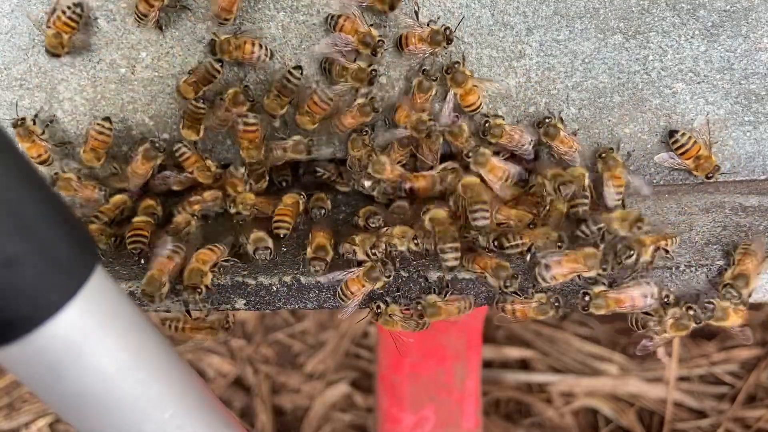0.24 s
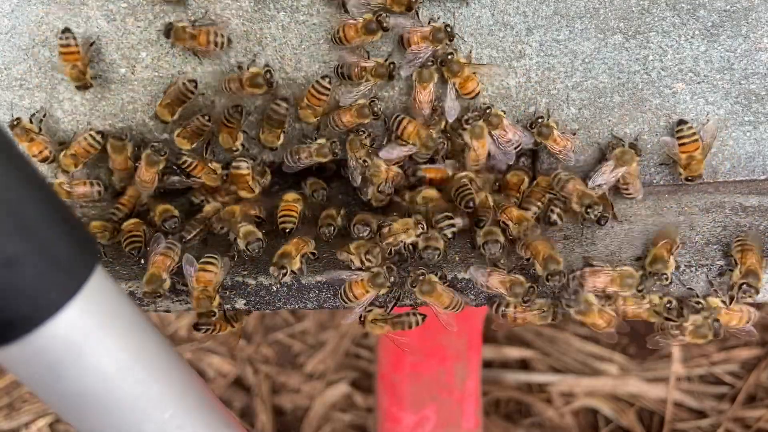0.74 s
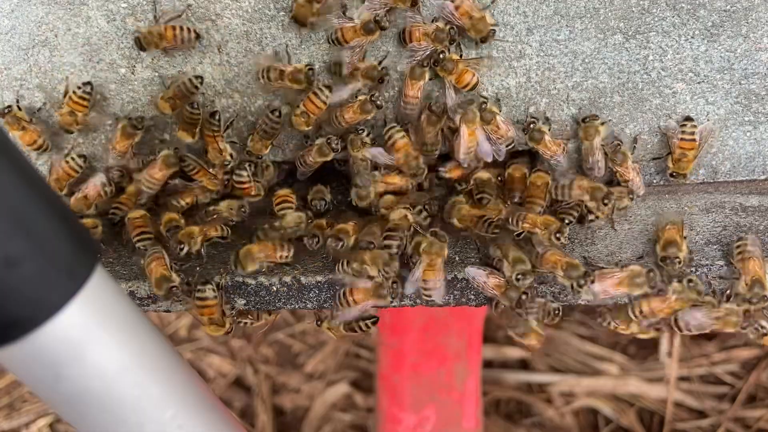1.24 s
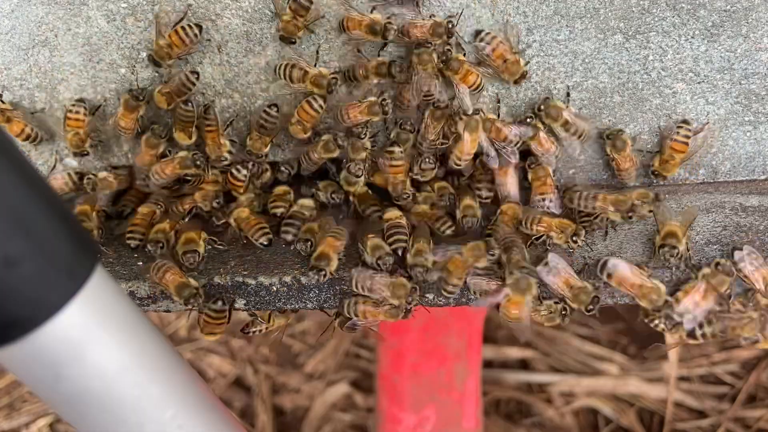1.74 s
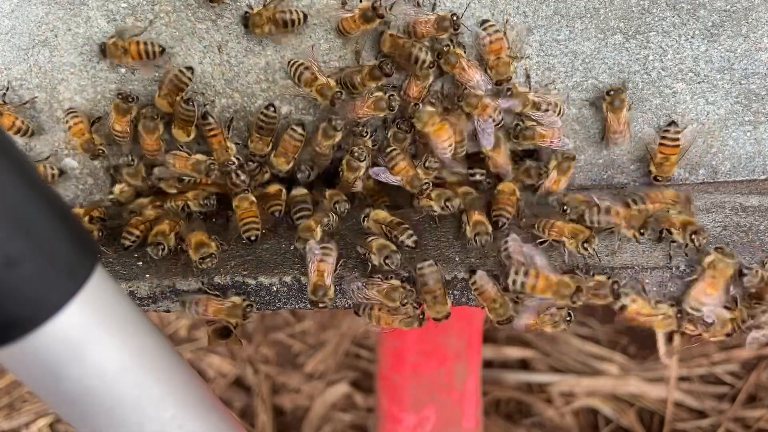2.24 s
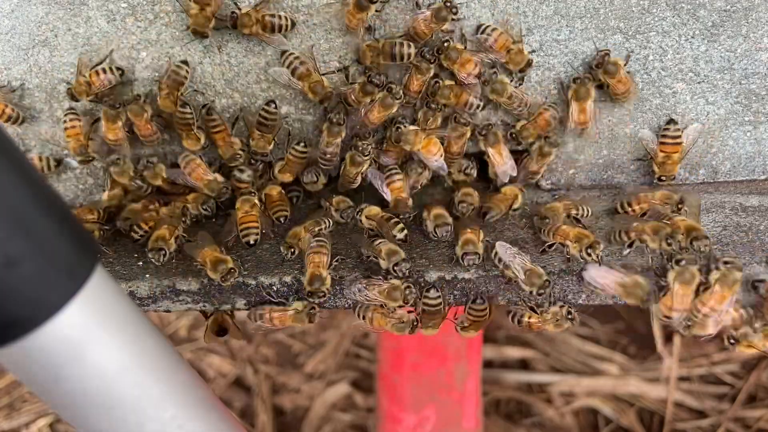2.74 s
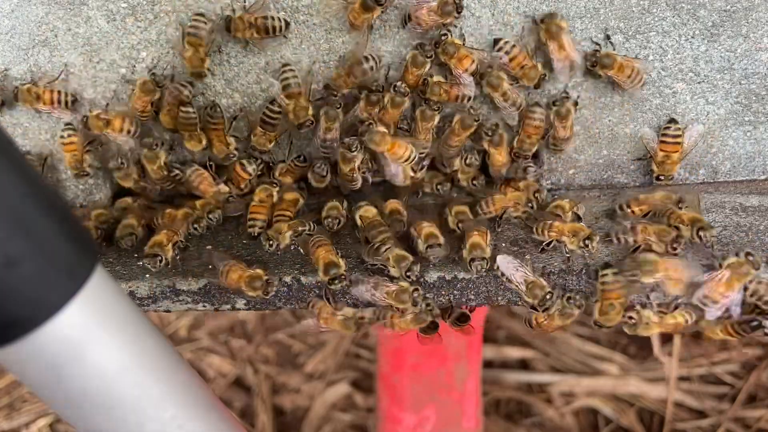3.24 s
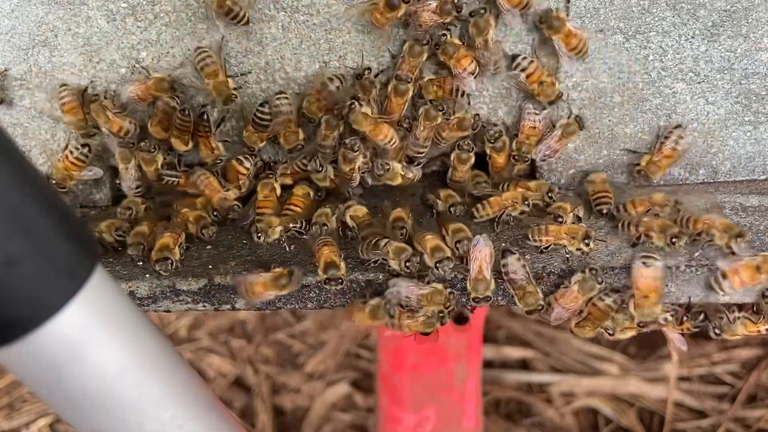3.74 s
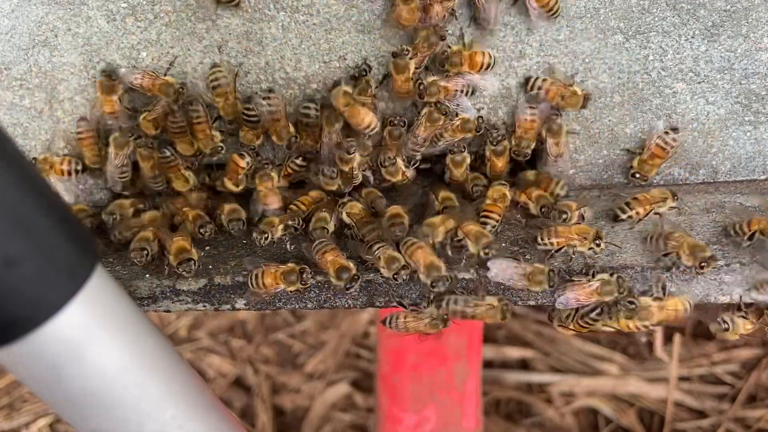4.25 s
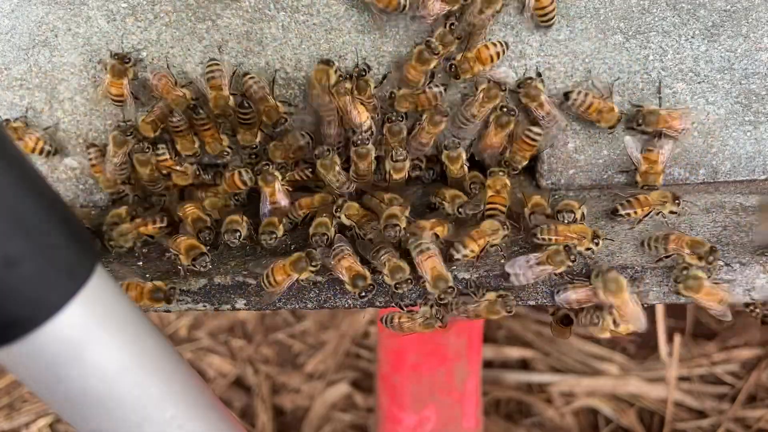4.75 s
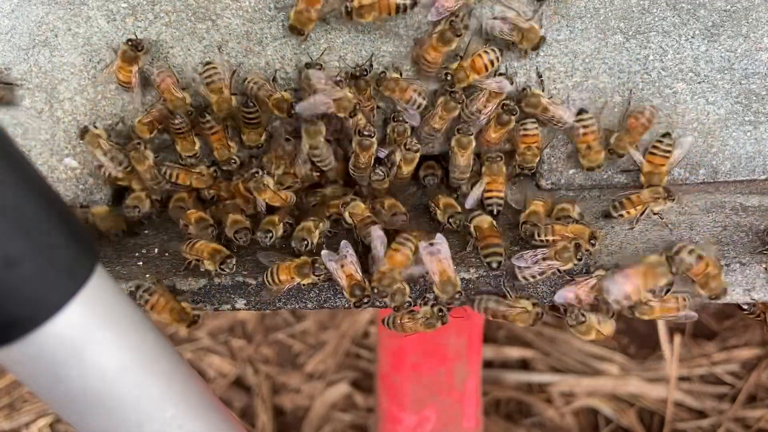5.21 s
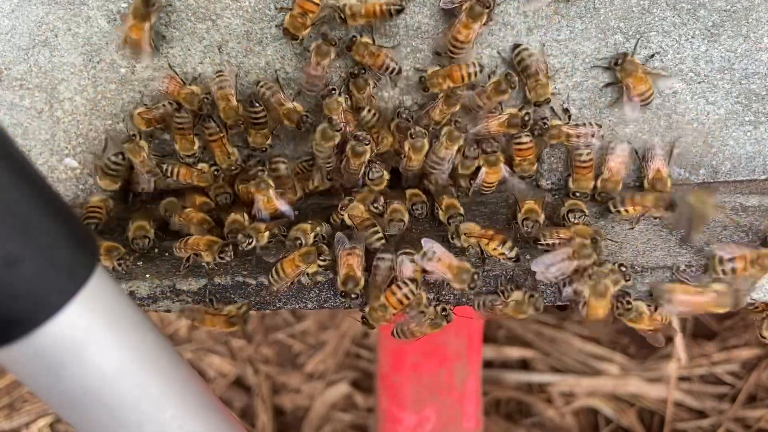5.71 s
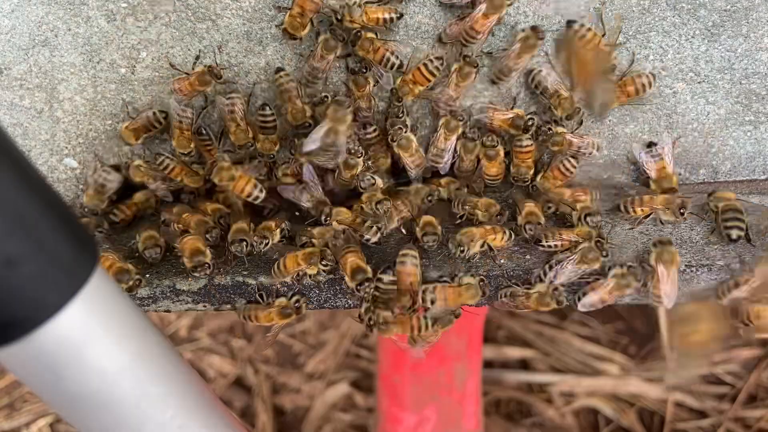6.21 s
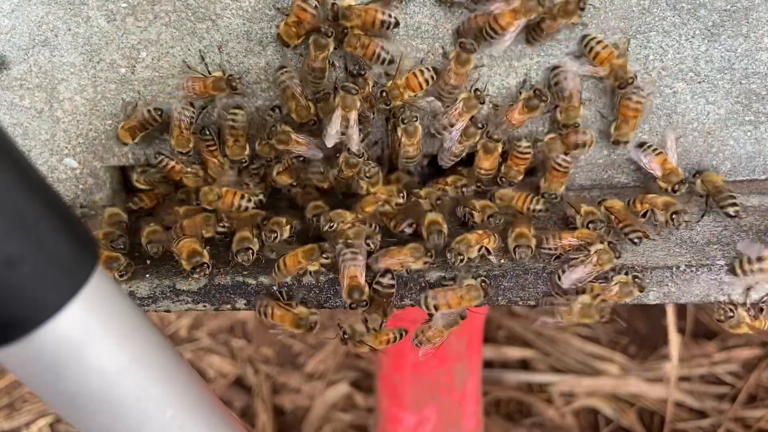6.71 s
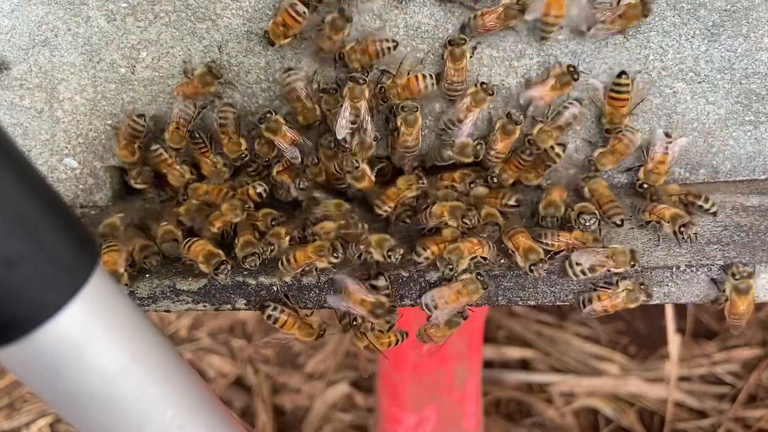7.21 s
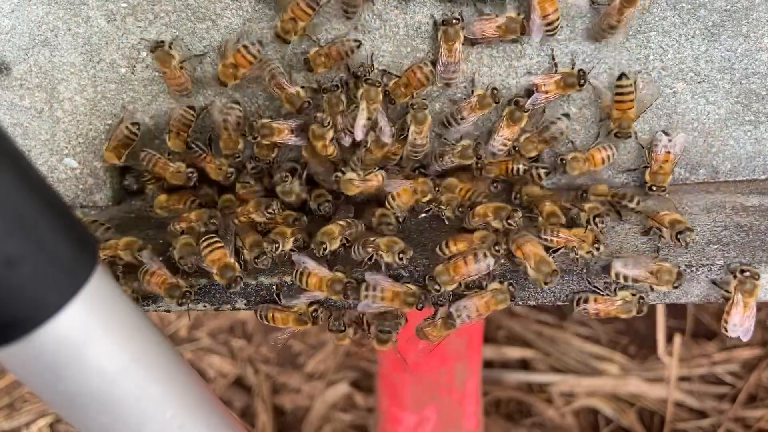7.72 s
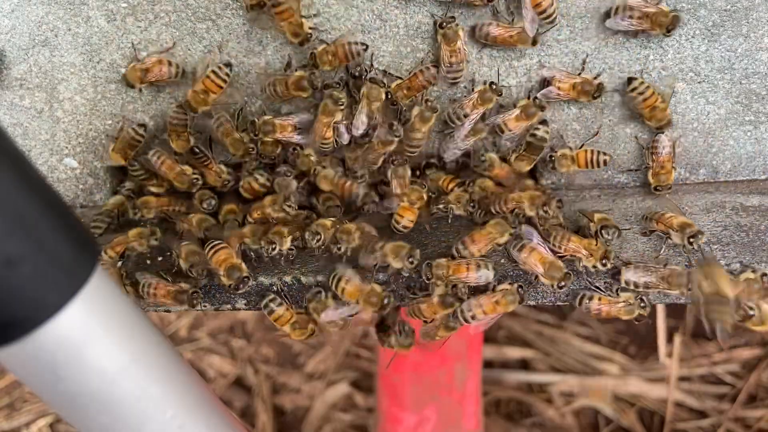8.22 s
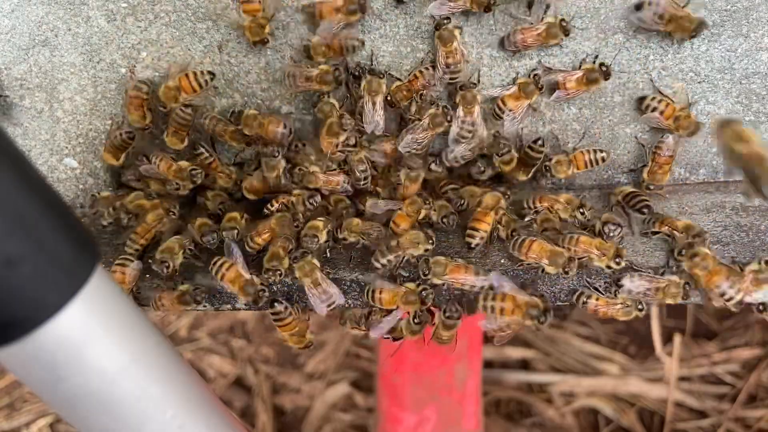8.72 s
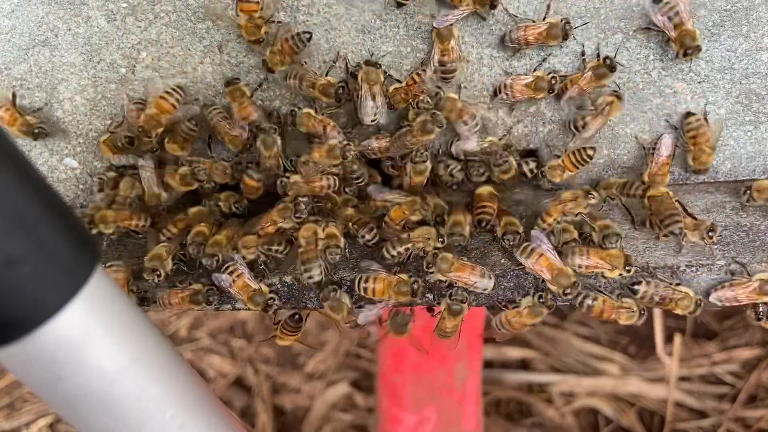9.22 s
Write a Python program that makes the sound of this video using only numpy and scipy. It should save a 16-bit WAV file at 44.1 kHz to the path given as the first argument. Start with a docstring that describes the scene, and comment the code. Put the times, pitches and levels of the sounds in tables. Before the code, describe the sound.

Dozens of honeybees hum steadily and close at a hive entrance, with nearby buzzes swelling, soft airy hiss and a few dull wind-like thumps.

```python
"""Honeybees at a hive entrance

Dozens of honeybees crowd a hive entrance, heard in stereo, close by in the open air through a phone.
Many wing strokes, each looped at its own drifting beat, blur into a hum, with hovering bees nearer by.
Brief swells of wing buzz ride on gliding beats, the strongest like bees passing close.
Downwash thumps are gusts of short decaying sine eddies.
Coloured noise gives the steady wing hiss and the low, puffing draught."""
import sys
import numpy as np
from scipy import signal
from scipy.fft import rfft, irfft, next_fast_len
from scipy.io import wavfile

SR = 44100
rng = np.random.default_rng(int(sys.argv[2]) if len(sys.argv) > 2 else 0)


def file_out(sig):
    """Save sig as 16-bit WAV at sys.argv[1]."""
    # one column per channel
    cols = np.atleast_2d(sig).T
    # limit, then scale
    lim = np.clip(cols, -1, 1)
    pcm = np.round(lim * 32767).astype(np.int16)
    wavfile.write(sys.argv[1], SR, pcm)


N = 417186

# wing sound by overtone, the first lifted close up by sloshing air:
# (multiple of the beat, far level [dB], near level [dB])
WING_OVERTONES = [(1, -12.5, -1), (2, -1, -8), (3, -13, -21.5), (4, -15, -22.5), (5, -11.5, -24.5),
                  (6, -11, -28), (7, -15, -41), (8, -23.5, -47), (9, -27, -40), (10, -29.5, -42),
                  (11, -26.5, -36), (12, -35, -49), (13, -42, -51), (14, -47, -52)]
_, FAR_DB, NEAR_DB = np.transpose(WING_OVERTONES)
# colour of the wing hiss: (frequency [Hz], relative level per Hz [dB])
HISS_COLOUR = [(300, -6.5), (600, -4.5), (1100, -7.5), (1650, -5.5), (2200, -9.5), (2900, -10), (3600, -14),
               (6800, -16), (8200, -16), (9800, -19.5), (11800, -18.5), (13500, -21.5), (14600, -18.5),
               (15700, -21.5)]
# hum of the whole crowd: (time [s], level [dB], middle wing beat [Hz])
CROWD_HUM = [(0, -40, 248), (0.66, -39, 249.5), (1.1, -40, 246.9), (1.9, -38, 247.8), (3.3, -37.5, 241.4),
             (4.5, -38.5, 246.4), (4.75, -35, 249.5), (5.1, -39, 243.7), (5.5, -35.5, 250.2),
             (5.75, -37.5, 243.7), (6.3, -36.5, 246.9), (6.8, -38, 241.8), (7.9, -37.5, 253.9),
             (9.0, -38, 248.9), (9.46, -37, 253.8)]
# waves of bees hovering near the phone:
# (time [s], buzz level [dB], draught level [dB], middle wing beat [Hz])
HOVER_WAVES = [(0, -38, -53, 240), (0.45, -38.5, -51, 227.6), (0.7, -37, -63, 247),
               (1.05, -56.5, -57.5, 240), (1.36, -55, -56, 242.3), (1.71, -37.5, -51.5, 253.7),
               (2.2, -41.5, -48.5, 246.2), (3.4, -41.5, -50.5, 233.7), (4.06, -42, -48.5, 241.8),
               (4.3, -38, -46.5, 238.2), (4.6, -42.5, -49.5, 245.8), (5.3, -34.5, -52, 238.3),
               (5.56, -47.5, -54, 246.8), (6.2, -44, -58, 244.2), (6.48, -45, -53, 251.7),
               (6.72, -37.5, -47.5, 230.2), (7.22, -39, -55, 248.3), (7.55, -60, -60, 254.2),
               (7.82, -51.5, -55, 250.4), (8.14, -38.5, -50, 255.1), (8.6, -40, -51.5, 242.9),
               (9.01, -39, -47.5, 252.3), (9.27, -37, -48, 259.5), (9.46, -37, -48, 239.7)]


def undb(db):
    """Decibels to gain."""
    return 10 ** (np.asarray(db) / 20)


def level(x, db):
    """Scale to an rms level."""
    return x * undb(db) / np.sqrt(np.mean(x ** 2))


def pan(left_minus_right_db):
    """Left and right gains that split a level difference evenly."""
    return undb(np.array([[left_minus_right_db], [-left_minus_right_db]]) / 2)


def curves(table):
    """Columns of a time table, one value per sample."""
    s, *columns = np.transpose(table)
    return [np.interp(np.arange(N) / SR, s, column) for column in columns]


def walk(rate):
    """Smooth random drift with about rate turns a second; spread near 1."""
    noise = rng.standard_normal(int(N / SR * rate * 4) + 12)
    steps = np.convolve(noise, np.hanning(9), "same")
    return np.interp(np.arange(N) * (rate * 4 / SR), np.arange(len(steps)), steps) / np.sqrt(3)


def wings(hz, order_db, lag_s):
    """One bee: a stroke shape built of overtones, looped at the beat rate, reaching the right side lag_s later."""
    turn = np.arange(257) / 256
    order = np.arange(1, len(order_db) + 1)[:, None]
    overtones = np.sin(2 * np.pi * (order * turn + rng.random(order.shape)))
    stroke = np.sum(undb(order_db)[:, None] * overtones, axis=0)
    phase = np.cumsum(hz) / SR
    return np.array([np.interp((phase - late) % 1, turn, stroke) for late in (0, lag_s * hz)])


def crowd(beat_hz, beat_spread, order_db, swell_db, side_db, spread_s, wander, count):
    """Many bees, each with its own beat, place and coming and going, blurring into one buzz."""
    flutter = .012  # quick unsteadiness, share of the beat
    edge_dull_db = -5  # bees far from the middle beat lose overtones, per octave
    out, octave = 0, np.log2(np.arange(len(order_db)) + 0.5)
    for k in range(count):
        lag_chance, side_chance = rng.standard_normal(2)
        own = np.arcsin(.9 * (2 * (k + .5) / count - 1))  # most beats near the middle of the range
        hz = beat_hz * (1 + beat_spread * own + wander * np.tanh(walk(5.0)) + flutter * walk(30))
        dull_db = edge_dull_db * own ** 2 * np.maximum(octave - 1, 0)
        colour_db = dull_db + 2.0 * rng.standard_normal(len(order_db))
        bee = wings(hz, order_db + colour_db, -.00015 + spread_s * lag_chance)
        coming_and_going = undb(swell_db * np.tanh(walk(11.0) / 1.63))
        out = out + bee * coming_and_going * pan(side_db + 3.6 * side_chance)
    return level(out, 0)


def airy(spectrum):
    """Coloured stereo noise: a shared part with a phase offset, the rest unrelated; rms 1."""
    # stereo image of the noise by frequency:
    # (frequency [Hz], likeness [0-1], phase offset, left ahead [rad], left minus right [dB])
    stereo_image = [(60, 0.84, -1, 4.5), (305, 0.48, 0, -9.5), (980, 0.73, -1.3, 6.5), (2210, 0.59, 0, -2),
                    (5270, 0.6, -1, -4), (7140, 0.52, 0.5, 2), (8350, 1, np.pi, -5), (9690, 1, np.pi, 1),
                    (11010, 0.86, 5.5, -0.5), (13660, 1, 6.5, 0.5), (14240, 0.99, 3 * np.pi, 0)]
    size = next_fast_len(N)
    log_hz = np.log(np.arange(size // 2 + 1) * SR / size + 1)
    hz, db = np.transpose(spectrum)
    image_hz, *columns = np.transpose(stereo_image)
    like, offset, pan_db = (np.interp(log_hz, np.log(image_hz), column) for column in columns)
    like = np.clip(like, 0, 1)
    left, other = rfft(rng.standard_normal((2, size)))
    right = like * left * np.exp(-1j * offset) + np.sqrt(1 - like ** 2) * other
    pair = np.array([left * undb(pan_db / 2), right * undb(-pan_db / 2)])
    colour = undb(np.interp(log_hz, np.log(hz), db))
    return level(irfft(pair * colour, size)[:, :N], 0)


def crowd_hum():
    """Dozens of far wing beats, close in rate, beat against each other as a hum."""
    hum_db, beat_hz = curves(CROWD_HUM)
    bees = crowd(beat_hz, .105, FAR_DB, swell_db=10.7, side_db=-3.0, spread_s=0.000599, wander=.027, count=34)
    return bees * undb(hum_db)


def hovering_bees():
    """A few bees near the phone, rich in the lowest overtone, come and go in waves."""
    buzz_db, _, beat_hz = curves(HOVER_WAVES)
    bees = crowd(beat_hz, .115, NEAR_DB, swell_db=10.8, side_db=-0.39, spread_s=0.00094, wander=.022, count=12)
    return bees * undb(buzz_db)


def buzz_swells():
    """Brief bell-curve swells of wing buzz on unsteady gliding beats, the strongest like bees passing close."""
    # (peak time [s], wing beat [Hz], buzz level before the swell [dB], bell-curve width [s],
    #  left minus right [dB], brightness [0 near - 1 far wing sound, below 0 beyond near], glide [Hz per s])
    swells = [(0.238, 241, -30.5, 0.015, -2.5, 0.2, -40), (0.45, 210, -43, 0.051, -4, .1, -45),
              (0.64, 251.8, -40.5, 0.06, 2.5, 0.47, -29.5), (1.56, 269.4, -38.5, 0.04, -5.5, 0.24, 31),
              (1.796, 278.5, -34, 0.025, -5.5, .15, -40), (2.3, 249.2, -40, 0.05, -3, 0.76, -39),
              (2.46, 237, -40, 0.06, -4, 0.9, -31.5), (3.45, 226.5, -40, 0.05, -6, 0.045, -44),
              (3.806, 215.7, -39, 0.056, -6.5, .1, -44), (3.816, 253.6, -35.5, 0.027, -6.5, -0.34, -38),
              (4.136, 248.7, -33, 0.033, -5, 0.18, -36), (4.255, 221.4, -38, 0.03, -5, 0.29, -58),
              (4.355, 253.5, -36, 0.026, -2, -0.56, -40), (4.754, 248, -30.5, 0.024, -7, -0.076, -37),
              (4.865, 264.1, -36, 0.075, 4.5, 0.25, -30.5), (4.934, 240.8, -34, 0.038, -3, -0.3, -42),
              (5.178, 241.7, -25.5, 0.055, -3, -0.096, -74), (5.478, 246.3, -27.5, 0.025, -4.5, 0.12, -58),
              (5.58, 261.7, -40.5, 0.05, -1.5, 0.84, -50), (6.13, 251.5, -43, 0.05, -2, 0.58, -34),
              (6.47, 248.3, -40.5, 0.05, -4.5, .6, 30.5), (6.6, 239.9, -35.5, 0.075, -6, 0.023, -110),
              (6.715, 217.8, -37, 0.037, -8, -0.37, -83), (6.795, 241.2, -40, 0.046, 8, -0.58, -59),
              (6.875, 214.1, -34.5, 0.03, 1, 0.28, -300), (6.925, 239.4, -44, 0.018, -1, 0.8, 300),
              (7.089, 250, -37, 0.026, 1, -0.21, -40), (7.239, 243.3, -39, 0.026, 0, -0.28, -40),
              (7.45, 256.2, -44.5, 0.04, -0.5, 0.89, 30), (8.12, 248, -39.5, 0.031, -7, 0.11, -40),
              (9.089, 266.7, -35, 0.041, -6, 0.14, -34), (9.179, 260, -39, 0.08, 7, -0.27, 29),
              (9.29, 273.3, -34, 0.055, -3, 0.74, 69), (9.374, 252.8, -36, 0.035, 1.5, 0.38, -38)]
    swell_hiss_db = -10.5  # hiss of a bright swell against its buzz, scaled by brightness
    out, unsteady, hiss = np.zeros((2, N)), walk(25), airy(HISS_COLOUR)
    for s, hz, db, width, pan_db, bright, glide in swells:
        first, last = max(int((s - 3 * width) * SR), 0), min(int((s + 3 * width) * SR), N)
        span = np.arange(first, last)
        t = span / SR - s
        beat_hz = hz * (1 + 0.01603 * unsteady[span]) + glide * t
        order_db = NEAR_DB + bright * (FAR_DB - NEAR_DB)
        buzz = level(wings(beat_hz, order_db, -.0001 * pan_db), db)
        swell_hiss = max(bright, 0) * undb(db + swell_hiss_db) * hiss[:, span]
        bell = np.exp(-(t / width) ** 2 / 2)
        out[:, span] += (buzz + swell_hiss) * bell * pan(pan_db)
    return out


def thumps():
    """Downwash gusts of shed eddies: small quick ones tend to arrive first, big slow ones last and stay longest."""
    # (start [s], level before the eddy balance [dB])
    gusts = [(0.243, -16), (2.69, -45), (4.707, -38), (4.797, -31.5), (4.817, -30), (5.174, -40),
             (5.483, -43), (6.502, -50), (7.029, -36.5), (8.25, -43), (9.389, -39)]
    # eddy sizes: (nominal rate [Hz], arrival [thump lengths], level [dB])
    eddies = [(55, 0.85, -18), (75.2, 0.59, -8.5), (111.4, 0.54, -6.5), (156, 0.51, -2), (201, 0.28, 2),
              (315, 0.45, 1.5), (460, 0.32, 2), (647, 0.37, -3), (834, 0.33, 0), (963, 0.29, -8)]
    thump_s = 0.043  # unit of eddy time; a gust lasts three
    fine_fall_db, hard_db, fine_gain = -11, -31.5, 0.4  # finer eddies fall per octave, less per dB above hard_db
    out = np.zeros((2, N + SR))
    count = 1 + np.arange(len(eddies)) // 2  # finer eddies come in greater numbers
    hz, arrival, eddy_db = np.repeat(np.transpose(eddies), count, axis=1)[:, :, None]
    share = np.repeat(count, count)[:, None] ** -.5
    t = np.arange(int(3 * thump_s * SR)) / SR / thump_s
    ragged = undb(1.8 * walk(60))  # the gust breaks up as it goes
    for s, db in gusts:
        fall_db = fine_fall_db + fine_gain * max(db - hard_db, 0)
        phase, detune, gap = rng.random((3,) + hz.shape)
        strength = share * undb(db + eddy_db + fall_db * np.log2(hz / 120))
        push = strength * (t / arrival * np.exp(1 - t / arrival)) ** 5.2  # peaks on arrival
        # each eddy slows as it spreads
        turns = hz * (0.8 + 0.414 * detune) * thump_s * t * (1 - 0.053 * t) + phase
        start = int(s * SR)
        push = push * np.resize(ragged[start:], len(t))
        for side in range(2):
            swirl = np.sin(2 * np.pi * (turns + side * 0.4 * (gap - .5)))
            out[side, start:start + len(t)] += np.sum(push * swirl, axis=0)
    return out[:, :N]


def wing_hiss():
    """Airy noise of the wings takes a share of the hum's swells, flickers and creeps up."""
    base_db, follows, rise_db_per_s = -47.5, 0.4, 0.12
    hum_db, _ = curves(CROWD_HUM)
    hiss_db = base_db + follows * (hum_db - hum_db.mean()) + rise_db_per_s * np.arange(N) / SR
    return airy(HISS_COLOUR) * undb(hiss_db + 0.62 * walk(26))


def draught():
    """Fanning wings stir the air in puffs, heard as low noise on the microphones."""
    # (frequency [Hz], relative level per Hz [dB])
    draught_colour = [(20, -18), (40, -11), (70, 2.5), (120, -3.5), (200, -4.5), (350, -7.5), (600, -10),
                      (1000, -30)]
    _, draught_db, _ = curves(HOVER_WAVES)
    return airy(draught_colour) * undb(draught_db + 2.5 * walk(12))


def scene():
    """Hum, hovering bees, buzz swells and thumps over wing hiss and draught."""
    bees = crowd_hum() + hovering_bees() + buzz_swells()
    return bees + thumps() + wing_hiss() + draught()


def record(dry):
    """The phone drops the deepest bass and cuts the top."""
    low_cut_hz, top_hz = 42, 15770
    low_cut = signal.butter(2, low_cut_hz, "high", fs=SR, output="sos")
    top_cut = signal.ellip(10, .2, 70, top_hz, fs=SR, output="sos")  # 0.2 dB ripple, 70 dB down above
    return signal.sosfilt(top_cut, signal.sosfilt(low_cut, dry))


dry = scene()
out = record(dry)
file_out(out)
```